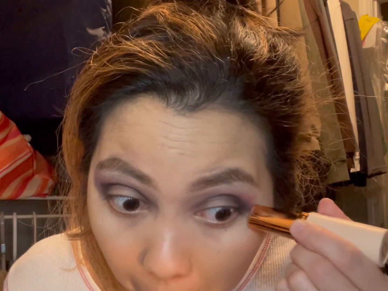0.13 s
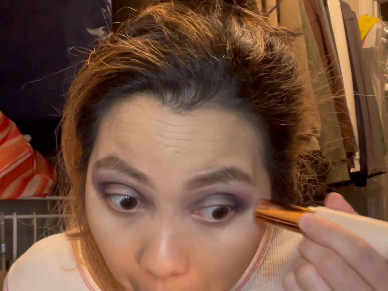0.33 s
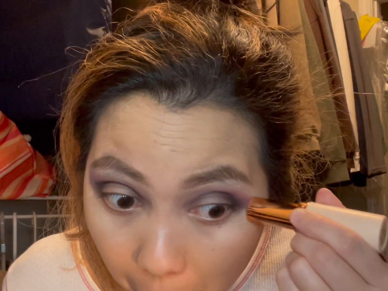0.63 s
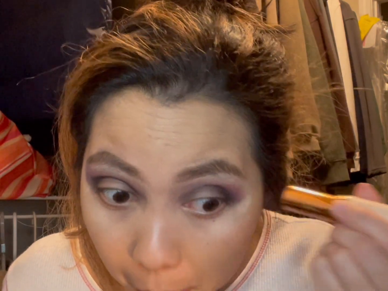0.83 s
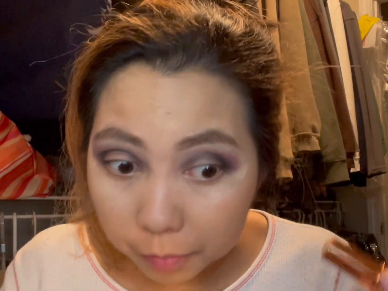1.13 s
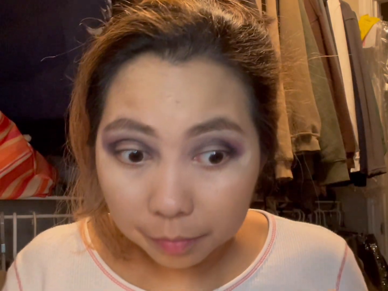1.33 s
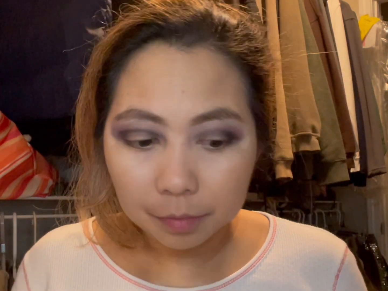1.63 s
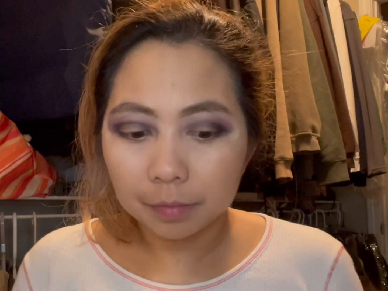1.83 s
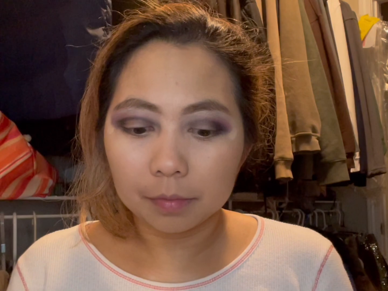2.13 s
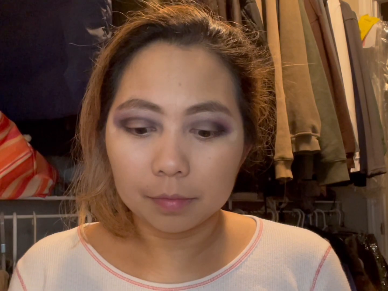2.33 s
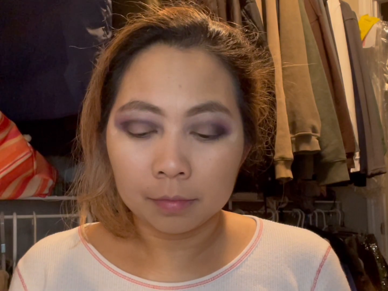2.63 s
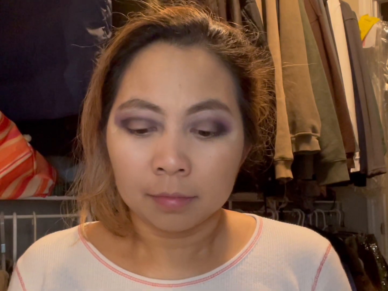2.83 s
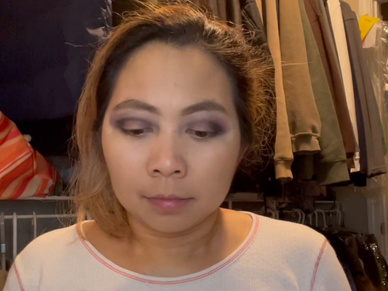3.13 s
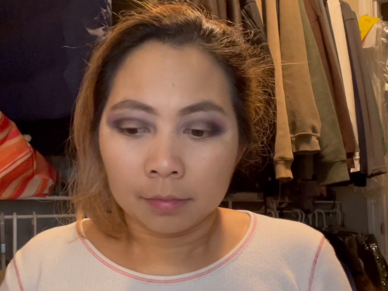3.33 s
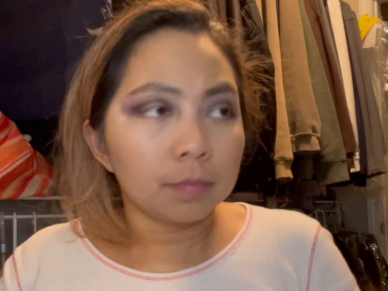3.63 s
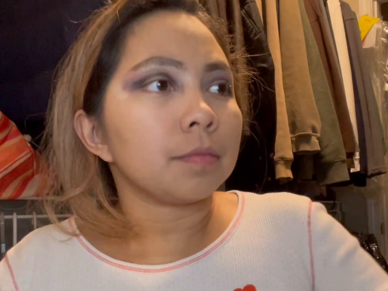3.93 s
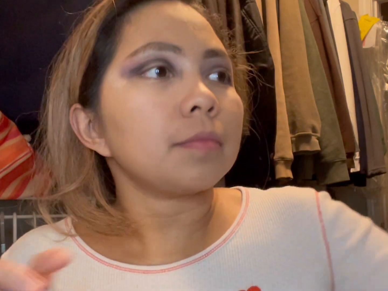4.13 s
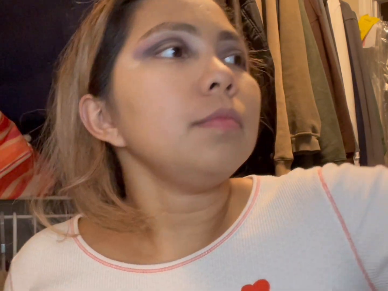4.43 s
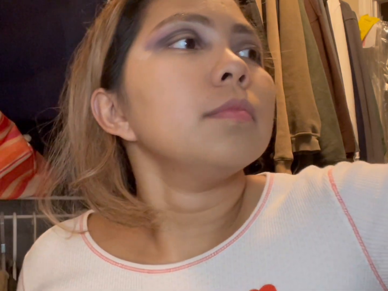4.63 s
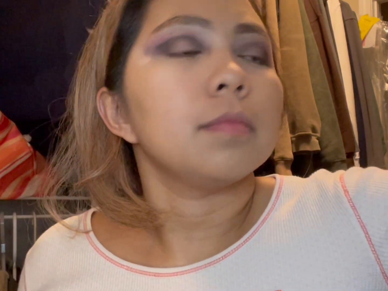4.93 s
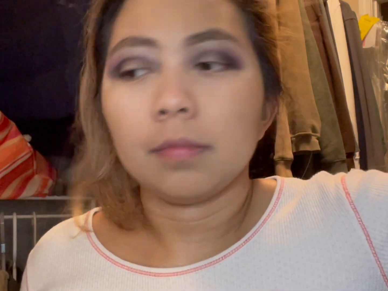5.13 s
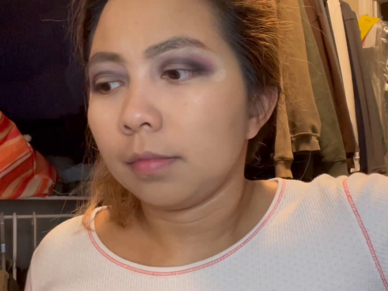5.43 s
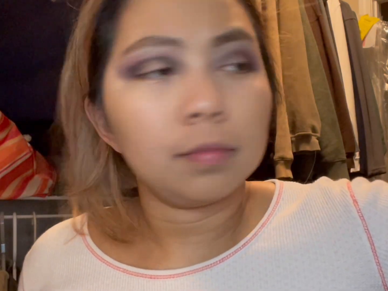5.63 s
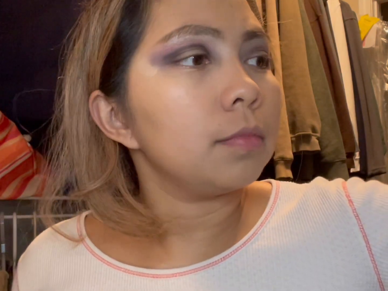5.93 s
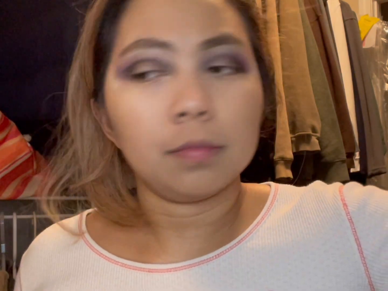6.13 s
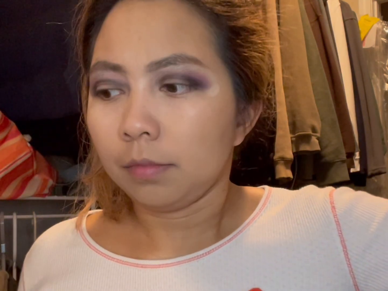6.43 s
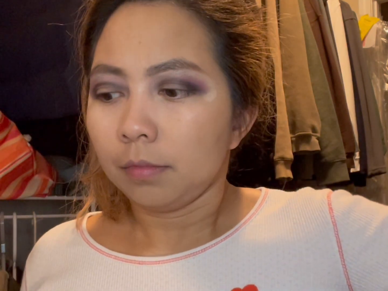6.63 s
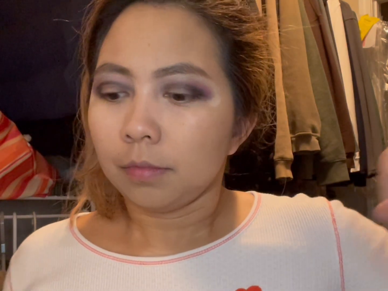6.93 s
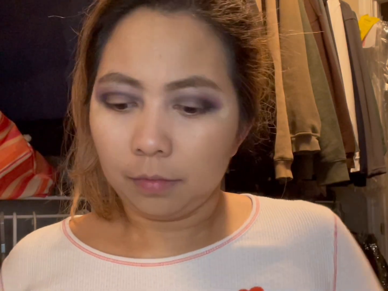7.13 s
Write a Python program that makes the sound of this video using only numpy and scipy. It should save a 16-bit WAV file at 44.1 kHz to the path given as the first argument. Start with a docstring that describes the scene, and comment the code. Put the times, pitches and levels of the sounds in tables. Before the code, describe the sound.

Close to a phone in a small room full of clothes, a low ventilation hum runs throughout. Faint sleeve and plastic rubs come first, then a crisp cap tick, light clicks and a loud hollow snap with a second pop just after. Next, small items clatter together on a shelf, pause, and one lands with a hard clack and rocks quickly to rest.

```python
"""A cap ticks and pops off its tube, a case snaps shut; sleeves and fingers brush softly, close to a phone.
Then things are picked through and put down on a shelf, where one rocks to rest; ventilation hums low.
Clicks, knocks and thuds are decaying modes and shaped noise bursts; brushes and rubs are clumpy hiss.
A short room full of clothes answers clicks and knocks; the hum is motor lines over shaped noise."""
import sys
import numpy as np
from scipy import signal
from scipy.fft import rfft, irfft
from scipy.io import wavfile
from scipy.ndimage import uniform_filter1d

SR = 44100
rng = np.random.default_rng(int(sys.argv[2]) if len(sys.argv) > 2 else 0)


def output_pcm(signal):
    """Save a mono or channel-first signal as 16-bit PCM at the path in sys.argv[1].

    Samples are clipped to [-1, 1] before scaling.
    """
    pcm = np.clip(np.atleast_2d(signal).T, -1, 1) * 32767
    wavfile.write(sys.argv[1], SR, np.round(pcm).astype(np.int16))


N = 320607
T = np.arange(SR * 3 // 10) / SR  # s, clock of one short sound


def amp(db):
    """Decibels to gain."""
    return 10 ** (np.asarray(db) / 20)


def read(points, hz):
    """A curve over frequency, joined by straight lines over log frequency."""
    f, value = np.transpose(points)
    return np.interp(np.log(hz + 1), np.log(f), value)


def bins(size):
    """The frequencies of a transform, Hz."""
    return np.fft.rfftfreq(size, 1 / SR)


def blow(x):
    """Scales a short sound to the energy of 10 ms at full level."""
    energy = np.mean(np.sum(x ** 2, -1))
    return x / np.sqrt(energy * 100 / SR + 1e-20)


def sides(db):
    """Left and right gains for a left-right level difference."""
    return amp([[db / 2], [-db / 2]])


def add(mix, s, sound):
    """Lays a stereo sound into the mix from time s."""
    first = max(round(s * SR), 0)
    part = mix[:, first:][:, :sound.shape[-1]]
    part += sound[:, :part.shape[1]]


def causal(gain):
    """The impulse response with this gain curve that starts at once (minimum phase)."""
    both_sides = np.r_[gain, gain[-2:0:-1]]
    log_gain = np.log(np.maximum(both_sides, 1e-5))
    spectrum = np.exp(np.conj(signal.hilbert(log_gain)))
    return irfft(spectrum[:len(gain)])[:4096]


def through(x, response):
    """Convolution that keeps the length."""
    return signal.fftconvolve(np.atleast_2d(x), np.atleast_2d(response), axes=1)[:, :x.shape[-1]]


def pair(size):
    """Stereo white noise: nearly mono in the bass and the top, wide between."""
    # left-right likeness: (f/Hz, correlation -1 to 1)
    likeness = [(50, .999), (80, .96), (125, .93), (250, .93), (500, .6), (1200, .35), (2500, .15),
                (4500, -.1), (7000, .5), (10000, .96)]
    mid, side = rfft(rng.standard_normal((2, size)))
    same = read(likeness, bins(size))
    mid = mid * np.sqrt((1 + same) / 2)
    side = side * np.sqrt((1 - same) / 2)
    return irfft(np.array([mid + side, mid - side]), size)


def stroke(centre_s, reach_s, db, centre_hz, spread_oct):
    """Surfaces catch and let go: clumpy hiss swells and fades, 17 dB down at +-reach_s."""
    # what rubbed plastic and cloth favour: (f/Hz, level/dB)
    rub_colour = [(300, -3.5), (900, -3), (1250, 3), (1620, 4), (2100, -1), (2750, -0.5), (3400, -4.5),
                  (4000, 0.5), (5100, -2), (6300, 0.5), (8500, 1.5), (10500, 2.5), (14000, 2.5), (16000, 7)]
    grain_db = 2  # standard deviation
    t = np.arange(-2 ** 14, 2 ** 14) / SR  # the longest stroke is cut at +-0.37 s
    hz = bins(len(t))
    clumps = uniform_filter1d(rng.standard_normal(len(t)), size=130)
    grains = pair(len(t)) * amp(grain_db * clumps / clumps.std())
    band = np.exp(-.5 * (np.log2((hz + 1) / centre_hz) / spread_oct) ** 2)
    hiss = irfft(rfft(grains) * amp(read(rub_colour, hz)) * band, len(t))
    swell = np.exp(-2 * abs(t / reach_s) ** 2.8)
    return centre_s + t[0], amp(db) * swell * hiss / hiss.std()


def room(x, wet_db, late_db=-30, build_s=.0012):
    """Close surfaces answer within milliseconds, differently each time; clothes soak it up."""
    # decay of the early answer: (f/Hz, t60/s)
    room_decay = [(150, 0.17), (500, 0.099), (1200, 0.059), (2500, 0.06), (5000, 0.1), (15000, 0.056)]
    late_t60_s = .22
    hz, t, z = signal.stft(pair(len(T)), SR, nperseg=128)
    early = amp(-60 * t / read(room_decay, hz)[:, None])
    late = amp(late_db - 60 * t / late_t60_s) / (1 + hz[:, None] / 5000)
    tail = signal.istft(z * (early + late), SR, nperseg=128)[1][:, :len(T)]
    tail = tail * (1 - np.exp(-(T / build_s) ** 2))
    return x + amp(wet_db) * through(x, tail / np.linalg.norm(tail[0]))


def click(hollow_hz, hollow_db, shell_db, crack_db):
    """An edge slips: a crack, the shell's modes, and tube air that takes a few cycles to swell."""
    # plastic shell modes: (f/Hz, relative level/dB, free t60/s)
    shell_modes = [(275, -16, .05), (378, -24.5, 0.065), (605, -23.5, 0.018), (650, -19, .03),
                   (1200, -12, .03), (1665, 0.5, .025), (2055, -6.5, 0.053), (2160, -10.5, .05),
                   (2640, 2, 0.02), (3010, -3, 0.012), (3850, -3.5, .02), (4500, -6, 0.019),
                   (6440, -10, 0.0098)]
    # edge crack spectrum: (f/Hz, relative level/dB)
    crack_colour = [(100, -19), (500, 0.5), (1500, -4.5), (4200, 11.5), (5200, -3.5), (7000, -6.5),
                    (8700, 7), (11000, -1.5), (16000, -9)]
    # left-right phase difference of the clicks: (f/Hz, phase/rad)
    phase_difference = [(100, 0), (1100, 1), (1600, 1.88), (2600, 0.79), (4500, 4), (6300, 6), (9000, 4.5),
                        (11500, 6.5)]
    swell_s, hollow_t60_s = .0014, .016
    grip_t60_s = .06  # the hand lets no mode ring longer
    grit, crack_t60_s = .18, .007
    hollow_pan_db, shell_pan_db = 5.5, 3.5  # left-right

    swell = (1 - np.exp(-T / swell_s)) ** 2
    hollow = np.sin(2 * np.pi * hollow_hz * T) * swell * amp(-60 * T / hollow_t60_s)
    shell = 0
    for k, (f, db, t60) in enumerate(shell_modes):
        decay = amp(db - 60 * T / min(t60, grip_t60_s))
        shell = shell + decay * np.sin(2 * np.pi * f * T) * (-1) ** k
    slip = (T == 0) + grit * rng.standard_normal(len(T)) * amp(-60 * T / crack_t60_s)
    crack = through(slip, causal(amp(read(crack_colour, bins(len(T))))))

    body = amp(hollow_db) * blow(hollow) * sides(hollow_pan_db)
    body = body + amp(shell_db) * blow(shell) * sides(shell_pan_db)
    left, right = body + amp(crack_db) * blow(crack)
    turn = np.exp(-1j * read(phase_difference, bins(2 * len(T))))
    right = irfft(rfft(right, 2 * len(T)) * turn)[:len(T)]
    return np.array([left, right])


def hands():
    """Caps and lids catch, click and slide home; harder clicks ring the shell more."""
    # clicks in the hands: (t/s, hollow f/Hz, hollow level/dB, crack level/dB), levels before the room
    clicks = [(1.7166, 1600, -49.5, -49.5), (2.615, 1670, -50, -60.5), (2.673, 1635, -53, -69.5),
              (3.1156, 1530, -53.5, -55.5), (3.134, 1324, -53, -52), (3.1499, 1180, -45.5, -50),
              (3.1747, 1100, -57, -60.5), (3.2809, 1100, -57, -58.5), (3.314, 1180, -20.5, -35),
              (3.4129, 550, -47, -44), (3.4168, 1090, -38, -26.5), (3.4197, 1704, -40, -40.5),
              (4.044, 3590, -60.5, -70), (4.213, 2700, -62.5, -69)]
    shell_even_db, shell_growth = -41, .25  # crack level where shell equals crack; dB gained per dB
    catch_s, catch_db, catch_hz = .006, -9, 2000  # edge scrapes around the slip; dB re crack
    slide_after_s, slide_s, slide_db, slide_hz = .016, .032, -19.5, 2300  # parts slide home; dB re crack
    mix = np.zeros((2, N))
    for s, hz, hollow_db, crack_db in clicks:
        shell_db = crack_db + shell_growth * (crack_db - shell_even_db)
        add(mix, *stroke(s, catch_s, crack_db + catch_db, catch_hz, spread_oct=1))
        add(mix, s, room(click(hz, hollow_db, shell_db, crack_db), wet_db=-9, build_s=.003))
        add(mix, *stroke(s + slide_after_s, slide_s, crack_db + slide_db, slide_hz, spread_oct=.35))
    return mix


def knock(board_db, clack_db, tick_db, spot_hz, clack_t60_s, detune=.006, bright_hz=3000):
    """A thing meets the shelf and chatters for an instant, which rings the board and the thing."""
    # shelf board modes: (f/Hz, relative level/dB, t60/s, left-right/dB)
    board_modes = [(268, 4, 0.081, 0.5), (294.2, -0.5, 0.11, -2), (350.3, -1, 0.043, 12.5),
                   (406, 2, 0.091, -5.5), (421.5, -8, 0.21, -5), (514.6, -17, 0.22, -3.5),
                   (610, -5.5, 0.011, -31), (669, -16.5, 0.07, -18.5), (689, -26.5, 0.075, -8)]
    # resonances of the things: (f/Hz, width/Hz, relative level/dB)
    clack_modes = [(545, 26, 0.5), (660, 55, 7.5), (924, 77, 6), (1030, 70, 2.5), (1285, 53, 3),
                   (1607, 240, -1), (2000, 92, 3.5), (2514, 42, -2.5), (2830, 49, -4.5), (3560, 60, -6)]
    # edge tick spectrum: (f/Hz, relative level/dB)
    tick_colour = [(1500, -54.5), (2800, 5), (3600, 5.5), (4600, -1), (5400, -5.5), (7500, -18),
                   (9500, -12), (15000, -33)]
    rise_s, rattle_t60_s, tick_t60_s = .0012, .08, .08
    favour_db, favour_oct = 5, .14  # the spot favours modes near spot_hz
    chatter_db, impact = -7, 4  # rattle re board modes; clack impulse re noise
    board_trim_db, clack_trim_db, tick_trim_db = -1, 2, 4.5

    hz = bins(len(T))
    onset = 1 - np.exp(-T / rise_s)
    board = 0
    for k, (f, db, t60, pan_db) in enumerate(board_modes):
        spot_db = favour_db * np.exp(-(np.log2(f / spot_hz) / favour_oct) ** 2) + rng.standard_normal()
        decay = amp(db + spot_db - 60 * T / t60)
        board = board + sides(pan_db) * decay * np.sin(2 * np.pi * f * T) * (-1) ** k
    rattle_band = 1 / (1 + (np.log2((hz + 1) / 480) / .41) ** 4)
    rattle = through(pair(len(T)) * amp(-60 * T / rattle_t60_s), causal(rattle_band))
    board = blow(board * onset) + amp(chatter_db) * sides(-2) * blow(rattle)

    power = 0
    for f, width, db in clack_modes:
        f = f * (1 + detune * rng.uniform(-.51, 1))  # grip and contact point shift it
        power = power + amp(2 * db) / (1 + ((hz ** 2 - f ** 2) / (width * hz + 1)) ** 2)
    top_hz = bright_hz * amp(.1 * (tick_db + 12))  # a blunt contact sounds duller
    casing = np.sqrt(power) / np.sqrt(1 + (hz / top_hz) ** 6)
    strike = impact * (np.arange(len(T)) == SR // 700)
    contact = strike + pair(len(T)) * onset * amp(-60 * T / clack_t60_s)
    clack = through(contact, causal(casing))

    tick_noise = pair(len(T)) * onset * amp(-60 * T / tick_t60_s)
    tick = through(tick_noise, causal(amp(read(tick_colour, hz))))
    sound = amp(board_trim_db) * board
    sound = sound + amp(clack_db + clack_trim_db) * sides(-3) * blow(clack)
    sound = sound + amp(tick_db + tick_trim_db) * blow(tick)
    return amp(board_db) * sound


def rocking(start_s, end_s, interval_s, board_db, fade_db_per_s, clack_db):
    """Even beats from foot to foot on one spot, each weaker and blunter than the one before."""
    soften_db_per_s, spot_hz, tick_db = 93.5, 406.5, -29  # tick re clack entry
    for age in np.arange(0, end_s - start_s, interval_s):
        beat_db = clack_db - soften_db_per_s * age
        yield start_s + age, board_db - fade_db_per_s * age, beat_db, beat_db + tick_db, spot_hz


def thud(hz, db):
    """The furniture gives under a push and swings: one decaying sine."""
    rise_s, t60_s = .0023, .3
    swing = np.sin(2 * np.pi * hz * T) * (1 - np.exp(-T / rise_s)) * amp(-60 * T / t60_s)
    return amp(db) * blow(swing) * sides(0)


def shelf():
    """Things scuff, knock and rock on the board; pushes shake the furniture."""
    # knocks: (t/s, board/dB, hardness = clack re board/dB, tick re board/dB, favoured f/Hz),
    # levels before knock's trims and the room
    knocks = [(4.665, -65, -22, -16.5, 264), (4.78, -58, -12.5, -20, 280), (4.832, -43, -16, -29, 420),
              (4.947, -49.5, -9, -26.5, 285), (4.966, -44.5, -20, -39, 269), (4.993, -29, -3.5, -26, 608),
              (5.009, -40, -1, -17.5, 406), (5.028, -37.5, -30, -32, 266), (5.06, -39, -12.5, -32, 287),
              (5.124, -59.5, -15, -51, 660), (5.197, -47.5, -11, -33, 296), (5.226, -52.5, -17, -45, 268.6),
              (5.321, -43, -10.5, -24, 279.5), (5.355, -57, -4.5, -22, 538), (5.391, -56.5, -13, -38, 277),
              (6.095, -64.5, -8.5, -11.5, 312), (6.268, -51, -10.5, -12.5, 522),
              (6.29, -51.5, -10, -13.5, 544), (6.334, -27, 3, -11.5, 668), (6.528, -51.5, -18.5, -30, 275),
              (6.56, -41.5, -2, -16, 395), (6.591, -45.5, 4.5, -22, 654), (6.799, -47, -13.5, -25, 280)]
    # rocking: (start t/s, end t/s, beat interval/s, first board/dB, fade/(dB/s), first hardness/dB),
    # levels before knock's trims and the room
    rocks = [(6.645, 6.79, .0415, -43.5, 22.5, -8.5), (6.868, 7.08, .049, -46.5, 63, -17)]
    # dull bumps through the furniture: (t/s, level/dB)
    thuds = [(4.669, -51), (4.996, -42), (5.327, -55), (6.336, -52), (6.594, -54), (7.02, -52)]
    picking_ends_s, picking_detune = 6, .071  # different things until then, one thing afterwards
    scuff_s, scuff_db, scuff_hz = .013, -18.5, 1300  # scuff on landing; dB re untrimmed clack
    roll_s, roll_db, roll_hz = .12, -20, 420  # rim rolls around the first beats; dB re first board entry
    mix = np.zeros((2, N))
    for s, board_db, hard_db, tick_db, hz in knocks:
        detune = picking_detune if s < picking_ends_s else 0
        add(mix, *stroke(s, scuff_s, board_db + hard_db + scuff_db, scuff_hz, spread_oct=.94))
        hit = knock(board_db, hard_db, tick_db, hz, clack_t60_s=.081, detune=detune)
        add(mix, s, room(hit, wet_db=-8, late_db=-19))
    for start, end, interval, board_db, *rest in rocks:
        add(mix, *stroke(start + roll_s / 2, roll_s, board_db + roll_db, roll_hz, spread_oct=.37))
        for s, *beat in rocking(start, end, interval, board_db, *rest):
            add(mix, s, room(knock(*beat, bright_hz=3340, clack_t60_s=.096), wet_db=-6))
    for s, db in thuds:
        add(mix, s, thud(98.2, db))
    return mix


def rub(centre_s, reach_s, db, centre_hz, spread_oct):
    """A stroke on plastic, coloured by the resonances of the tube at unchanged level."""
    # rubbed tube resonances: (f/Hz, width/Hz, level over plain hiss/dB)
    tube = [(1580, 170, -5), (2700, 300, 4), (4000, 350, 3)]
    start, hiss = stroke(centre_s, reach_s, db, centre_hz, spread_oct)
    hz = bins(len(T))
    gain = 1 + sum(amp(peak_db) / (1 + (2 * (hz - f) / width) ** 2) for f, width, peak_db in tube)
    rubbed = through(hiss, causal(gain))
    return start, rubbed * hiss.std() / rubbed.std()


def fickle(x):
    """The contact keeps changing as it slides, so the colour shifts in time-frequency patches."""
    patchy_db = 2  # standard deviation
    z = signal.stft(x, nperseg=512)[2]
    patches = uniform_filter1d(rng.standard_normal(z.shape[1:]), size=11, axis=0)
    patches = uniform_filter1d(patches, size=8, axis=1)
    return signal.istft(z * amp(patchy_db * patches / patches.std()), nperseg=512)[1][:, :N]


def rubbing():
    """Fingers, sleeves and plastic slide over each other, with fainter touches by chance."""
    # sleeves and fingers: (middle t/s, reach/s, level/dB, centre f/Hz), level before the patches
    swishes = [(1.347, 0.028, -73, 10500), (1.455, 0.075, -76, 9500), (1.633, 0.071, -68.5, 8400),
               (2.324, 0.091, -78.5, 7700), (2.597, 0.09, -64, 11000), (2.974, 0.082, -77, 13300),
               (3.609, 0.062, -61.5, 11500), (3.893, .049, -70, 12070), (4.063, .04, -67, 11790),
               (4.466, .082, -71.5, 11910), (4.756, 0.063, -69.5, 11070), (7.16, 0.16, -74, 12060)]
    # plastic along the tube: (middle t/s, reach/s, level/dB, centre f/Hz, spread/octave), same level
    rubs = [(1.08, 0.0072, -75, 2700, .8), (1.222, 0.29, -78.5, 1670, 1.06),
            (1.461, 0.022, -75, 1400, 0.92), (1.743, 0.035, -61.5, 2300, 1.57), (2.048, 1, -87, 2700, 0.17),
            (2.625, 0.021, -61.5, 4000, 0.11), (2.79, 0.14, -71.5, 2400, 0.71),
            (3.55, 0.15, -72, 2000, 0.65), (3.885, 0.036, -73.5, 3700, 0.53),
            (4.056, .021, -66, 3500, 0.22), (4.223, 0.021, -60.5, 2400, 0.28),
            (4.358, 0.028, -70, 1168, 0.65), (6.162, 0.063, -72, 1930, .9), (7.244, 0.1, -67.5, 2410, 0.81)]
    busy_from_s, busy_to_s = .7, 4.5
    touch_s, touch_db, touch_spread_db, touch_hz = .03, -81, 2, 9500
    mix = np.zeros((2, N))
    for row in swishes:
        add(mix, *stroke(*row, spread_oct=.98))
    for _ in range(12):
        s = rng.uniform(busy_from_s, busy_to_s)
        db = touch_db + touch_spread_db * rng.uniform(-1, 1)
        add(mix, *stroke(s, touch_s, db, touch_hz, spread_oct=.8))
    for row in rubs:
        add(mix, *rub(*row))
    return fickle(mix)


def ventilation():
    """Close motor lines beat against each other over a soft rumble and hiss."""
    # motor lines: (f/Hz, rms level/dB)
    motor_lines = [(52.8, -73.5), (59.3, -66), (83.5, -82.5), (120, -77.5)]
    # air of the room: (f/Hz, relative density/dB), before the rumble cut
    air_colour = [(15, -45), (30, -16.5), (48, -1), (65, -3), (85, -14.5), (115, -9), (150, -22.5),
                  (260, -29), (400, -36.5), (800, -42.5), (4600, -48), (5100, -56), (14000, -58.5),
                  (16000, -69)]
    air_db, rumble_db = -77, -5  # rms above 150 Hz before the cut; low-frequency cut
    waver_rad, lag_s = .04, .0001  # slow phase wander; hum reaches the right channel later
    hz = bins(N)
    air = rfft(pair(N)) * amp(read(air_colour, hz))
    air /= irfft(air * (hz > 150), N).std()
    air *= amp(rumble_db / (1 + (hz / 110) ** 4))
    clock = np.arange(N) / SR
    heard = np.array([clock, clock - lag_s])
    knots = np.linspace(0, N / SR, num=24)
    hum = 0
    for f, db in motor_lines:
        wander = waver_rad * np.interp(clock, knots, rng.standard_normal(len(knots)))
        phase = 2 * np.pi * (f * heard + rng.random()) + wander
        hum = hum + amp(db) * np.sqrt(2) * np.sin(phase)
    return amp(air_db) * irfft(air, N) + hum


def scene():
    """The hands, the shelf, the rubbing and the ventilation together."""
    return hands() + shelf() + rubbing() + ventilation()


def record(dry):
    """The top is rolled off near 16 kHz: a linear-phase low-pass."""
    edge_hz = 15900
    lowpass = signal.firwin(511, edge_hz, window=("kaiser", 9), fs=SR)
    return signal.oaconvolve(dry, lowpass[None], "same")


dry = scene()
out = record(dry)
output_pcm(out)
```